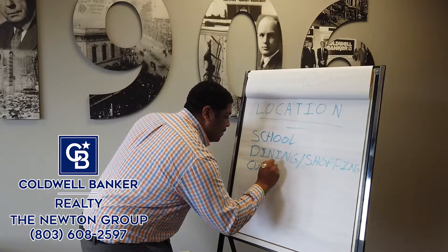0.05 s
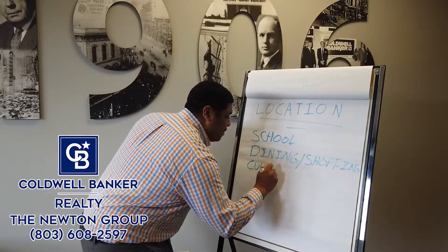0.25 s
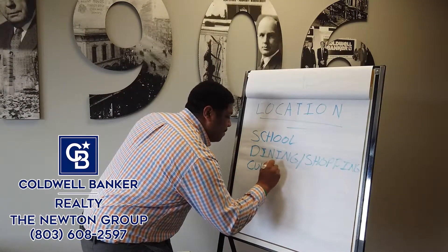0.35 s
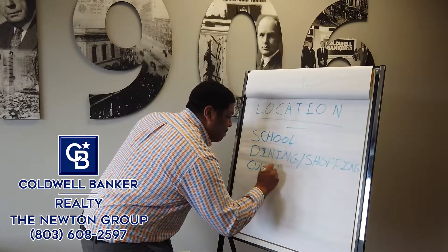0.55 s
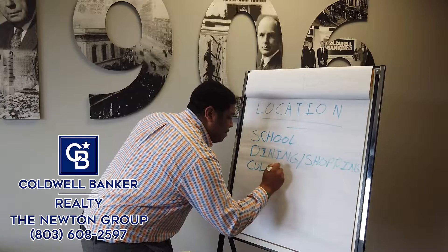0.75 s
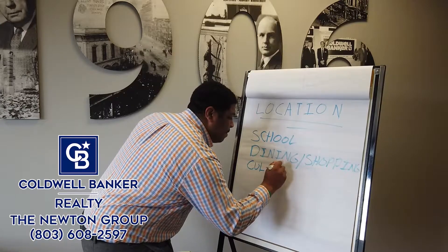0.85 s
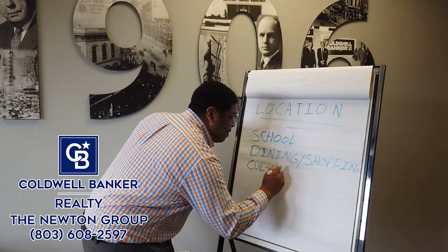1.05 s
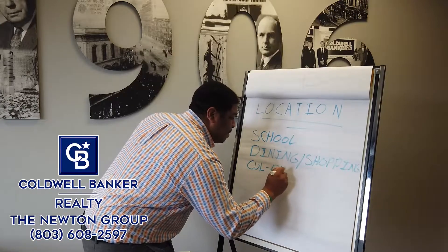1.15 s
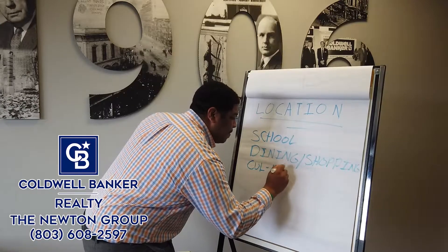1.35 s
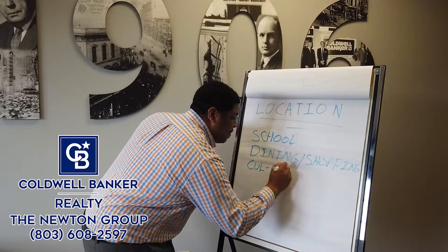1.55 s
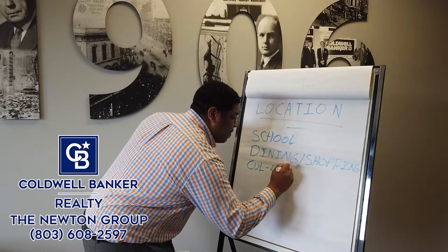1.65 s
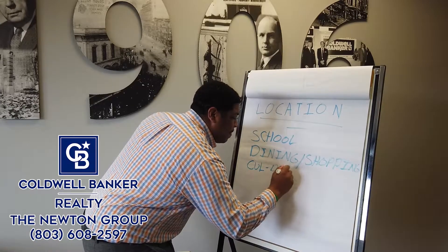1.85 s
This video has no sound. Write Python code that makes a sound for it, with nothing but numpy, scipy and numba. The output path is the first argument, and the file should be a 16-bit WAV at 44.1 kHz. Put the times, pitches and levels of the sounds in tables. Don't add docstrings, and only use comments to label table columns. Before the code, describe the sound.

A felt-tip marker writes on a large paper pad in quick, squeaky, scratchy strokes over ventilation rumble

```python
import sys
import numpy as np
from scipy import signal
from scipy.io import wavfile
from scipy.ndimage import uniform_filter1d, map_coordinates
from numba import njit

SR = 44100
rng = np.random.default_rng(int(sys.argv[2]) if len(sys.argv) > 2 else 0)


def master(y):
    cut = np.clip(np.atleast_2d(y).T, -1, 1)
    pcm = np.round(cut * 32767)
    wavfile.write(sys.argv[1], SR, pcm.astype(np.int16))


def to_linear_factor(level_db):
    exponent = np.asarray(level_db, float) / 20
    return 10 ** exponent


N = 83790

# (centre [Hz], width [Hz], level [dB])
BOARD_MODES = [(700, 350, -1), (1093, 170, 3.5), (1500, 1500, 8), (1830, 1270, -1), (2484, 230, -11)]


def unit(x):
    return x / np.sqrt(np.mean(x ** 2))


def walk(rate_hz):
    knots = rng.standard_normal(2000)
    return map_coordinates(knots, [np.arange(N) / SR * rate_hz], order=3, mode="mirror")


@njit
def svf(x, hz, width_hz):
    y, band, low = np.empty(len(x)), 0., 0.
    for i in range(len(x)):
        g, damping = np.tan(np.pi * hz[i] / SR), width_hz / hz[i]
        v = (band + g * (x[i] - low)) / (1 + g * (g + damping))
        low += 2 * g * v
        band = 2 * v - band
        y[i] = damping * v
    return y


def bandpass(x, hz, width_hz):
    return svf(x, np.full(N, float(hz)), float(width_hz))


def hush(hz, width_hz):
    return unit(bandpass(rng.standard_normal(N), hz, width_hz))


def ring(x, modes):
    drift_share, drift_hz, drift_db = .015, 25, 1.2
    out = 0
    for hz, width_hz, db in modes:
        centre_hz = hz * (1 + drift_share * walk(drift_hz))
        level = to_linear_factor(db + drift_db * walk(drift_hz))
        pass_hz = 1.77 * width_hz
        out = out + level * svf(svf(x, centre_hz, pass_hz), centre_hz, pass_hz)
    return unit(out)


def wash():
    # (frequency [Hz], density [dB per Hz])
    air_bands = [(30, 2.5), (100, -7.5), (210, -6), (460, -12.5), (1080, -14.5), (1300, -26), (2850, -27.5),
                 (13000, -37)]
    table_hz, table_db = np.transpose(air_bands)
    out = 0
    for hz in 35 * 2 ** np.arange(0, 8.9, 1 / 3):
        density_db = np.interp(np.log(hz), np.log(table_hz), table_db)
        wander_db = 2.2 * walk(4) * min(1, 900 / hz)
        band = unit(bandpass(hush(hz, hz / 3), hz, hz / 3))
        out = out + to_linear_factor(density_db + 10 * np.log10(hz) + wander_db) * band
    return unit(out)


def ventilation():
    # (centre [Hz], width [Hz], level [dB])
    boom_modes = [(57.6, 4.8, -64), (104.2, 2.7, -70), (160.3, 6.9, -67.5), (186.3, 22, -65),
                  (240.6, 24, -64.5), (332.2, 25.5, -64), (742, 180, -65)]
    # (time [s], length [s], frequency [Hz], level [dB])
    drones = [
        (0, 0.16, 199.4, -54),
        (0.17, 0.38, 248.4, -57),
        (0.484, 0.068, 178.2, -51.5),
        (0.848, 0.32, 231, -54.5),
        (1.626, 0.2, 209, -61),
    ]
    wash_db, side_db, boom_wander_db, drone_width_hz = -58.5, -82.5, -1.5, 2.5
    t = np.arange(N) / SR
    out = wash() * to_linear_factor(wash_db)
    for hz, width_hz, db in boom_modes:
        out = out + hush(hz, width_hz) * to_linear_factor(db + boom_wander_db * walk(4.24))
    for start_s, length_s, hz, db in drones:
        swell = np.sqrt(np.sin(np.pi * np.clip((t - start_s) / length_s, 0, 1)).clip(0))
        cycles = np.cumsum(hz + drone_width_hz * walk(14.43)) / SR
        out = out + to_linear_factor(db + 1.3 * walk(11.7)) * swell * np.sin(2 * np.pi * cycles)
    return out + to_linear_factor(side_db) * wash() * np.array([[1], [-1]])


def room(x):
    early_db, early_t60_s = -13, .025
    tail_db, tail_t60_s = -23.5, 0.41
    likeness, port_lag_s = 0.86, 3e-6
    t = np.arange(SR // 2) / SR
    opposite = np.array([[1], [-1]])

    def fall(db, t60_s):
        return to_linear_factor(db - 60 * t / t60_s) * np.sqrt(2 * np.log(1000) / (t60_s * SR))

    mid, side = rng.standard_normal((2, len(t)))
    shape = np.hypot(fall(early_db, early_t60_s), fall(tail_db, tail_t60_s))
    ports = np.sqrt((1 + likeness) / 2) * mid + np.sqrt((1 - likeness) / 2) * side * opposite
    lag = np.gradient(x) * port_lag_s * SR * opposite
    return x + lag + signal.fftconvolve(x[None], shape * ports, axes=1)[:, :N]


def catches():
    catches_per_s, spread_db = 16000, 2
    hit, size, sign = rng.random((3, N))
    return (hit < catches_per_s / SR) * to_linear_factor(-spread_db * np.log(1 - size)) * np.sign(sign - .5)


def taps():
    # (time [s], level [dB])
    touches = [
        (1.787, -57),
    ]
    decay_s = 0.0045
    t = np.arange(N) / SR
    envelope = 0
    for start_s, db in touches:
        envelope = envelope + to_linear_factor(db - 11) * (t > start_s) * np.exp(-np.abs(t - start_s) / decay_s)
    return ring(catches(), BOARD_MODES) * envelope


def marker():
    # (centre [Hz], width [Hz], level [dB])
    sheet_modes = [(3410, 300, -8.5), (4283, 760, 2), (4818, 670, 6), (5513, 830, 3)]
    tip_modes = [(6460, 420, -6), (6524, 256, -4.5), (6943, 750, -0.5), (7430, 790, -11.5)]
    edge_modes = [(9050, 1300, 8.5), (9710, 1000, 3), (10630, 400, -4.5), (12200, 980, -11),
                  (13500, 1800, -37)]
    # (time [s], rub level [dB], tip squeak [dB], bright edge [dB], board boom [dB]),
    # the last three over the rub
    curls = [
        [(0.19, -92, 2, 6, 11), (0.208, -49, -8, -10, -4), (0.226, -45, -5, -8.5, -9.5),
         (0.258, -46.5, -2, -2.5, -10), (0.32, -45, -5, -10.5, -11), (0.338, -45.5, -11, -14, -12),
         (0.35, -77, -7, -4, 8), (0.365, -71, -14, -6, 10)],
        [(0.37, -65, -6, -7, 1), (0.378, -73.5, 6, -1, 9), (0.39, -41.5, -7, -5, -10.5),
         (0.434, -45, -7.5, -2, -11.5), (0.498, -44.5, 0.5, -5.5, -14.5), (0.544, -48, 9, 2.5, 1),
         (0.556, -47.5, 0, 5, -7.5), (0.575, -48, -11, 5, -4)],
        [(0.575, -46.5, 0.5, 1, -9.5), (0.609, -42, -7, -1.5, -14), (0.621, -41, 3.5, -1.5, -11.5),
         (0.631, -41, 4, 3.5, -10.5), (0.669, -49, 14, 0, 0), (0.701, -39, -13.5, -10, -14.5),
         (0.737, -70.5, -17, -10, -2), (0.76, -69, -15, -5, -11)],
    ]
    bars = [
        [(0.99, -78.5, 3, 3, 4), (1.012, -42.5, -4, -3, -5), (1.046, -47.5, 1, 1, -6.5),
         (1.094, -41.5, -6, -9, -12), (1.112, -49.5, -4, -8, -5.5), (1.124, -69, -4, 4, 14),
         (1.14, -68, -2, -9, 2)],
        [(1.165, -81, -1, -3, 0), (1.181, -41, -4.5, -12.5, -11.5), (1.201, -44, 6.5, -2, -9.5),
         (1.247, -49.5, 6, -2.5, -6), (1.273, -56.5, 1.5, -8, -2.5), (1.283, -77, -1, 1, -1),
         (1.295, -65, 3, 4, 1)],
    ]
    flicks = [
        [(1.415, -87, -1, 7, 6), (1.429, -46.5, 2.5, -11, -4), (1.449, -44.5, 4, -3, -4),
         (1.483, -47.5, 0, -5, -14), (1.497, -68, -1, -3, 1), (1.51, -61, -4, -1, -11)],
        [(1.592, -98.5, 8, 10, -6), (1.6, -50.5, -3, -13, -11), (1.61, -45.5, 3, -6.5, -2.5),
         (1.634, -48.5, 7, -0.5, -5), (1.68, -74, 0, -2, -6)],
    ]
    flutter_db, flutter_hz, chatter_db, chatter_hz = 1, 40.1, 2, 249.2
    t = np.arange(N) / SR
    strokes = curls + bars + flicks
    rows = np.concatenate([np.array(stroke, float) for stroke in strokes])
    rub_db, squeak_db, bright_db, boom_db = (np.interp(t, rows[:, 0], rows[:, k]) for k in (1, 2, 3, 4))
    touching = sum((t >= stroke[0][0]) & (t < stroke[-1][0]) for stroke in strokes) > 0
    contact = uniform_filter1d(1. * touching, size=200)

    sheet_db = flutter_db * walk(flutter_hz) + 0.89 * walk(chatter_hz)
    chatter = chatter_db * walk(chatter_hz).clip(-3, 2.) * np.clip(squeak_db / 10, .15, 1.3)
    sheet = ring(catches(), sheet_modes) * to_linear_factor(sheet_db)
    tip = ring(catches(), tip_modes) * to_linear_factor(squeak_db + chatter)
    edge = ring(catches(), edge_modes) * to_linear_factor(bright_db + flutter_db * walk(flutter_hz))
    board = ring(catches(), BOARD_MODES) * to_linear_factor(boom_db)
    return to_linear_factor(rub_db) * contact * (sheet + tip + edge + board)


def scene():
    # (centre [Hz], width [Hz])
    dips = [(2650, 220), (5750, 185)]
    pen = marker() + taps()
    for hz, width_hz in dips:
        pen = pen - .8 * bandpass(pen, hz, width_hz)
    return room(pen) + ventilation()


def roll_off(x):
    return signal.sosfilt(signal.butter(12, 15550, fs=SR, output="sos"), x)


def record(dry):
    hiss_db, hiss_hz, hiss_width_hz, top_hz = -73.5, 8100, 17000, 15550
    hiss = np.array([bandpass(hush(hiss_hz, hiss_width_hz), hiss_hz, hiss_width_hz) for _ in range(2)])
    lowpass = signal.ellip(10, .3, 80, top_hz, fs=SR, output="sos")
    heard = signal.sosfilt(lowpass, dry + to_linear_factor(hiss_db) * hiss)
    return roll_off(heard)


dry = scene()
out = record(dry)
master(out)
```